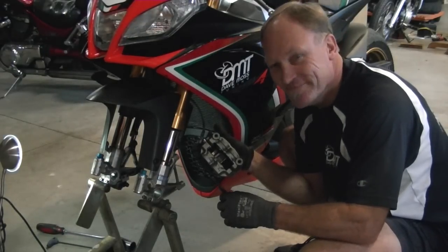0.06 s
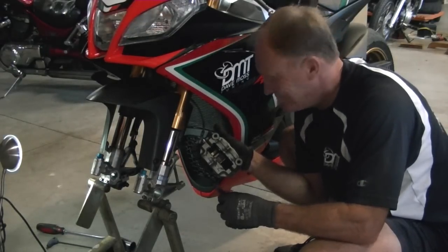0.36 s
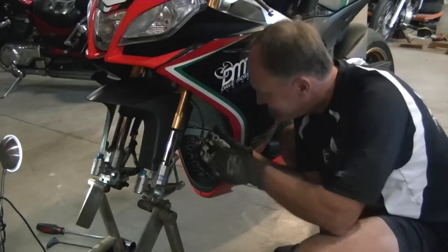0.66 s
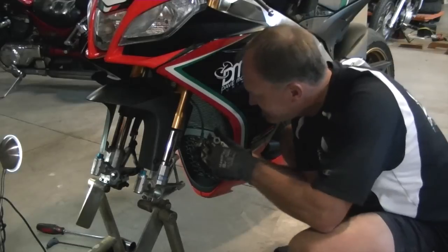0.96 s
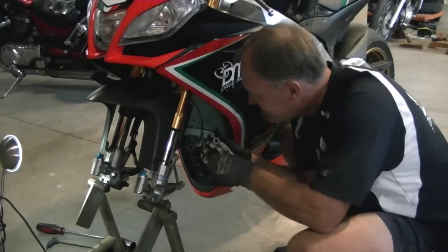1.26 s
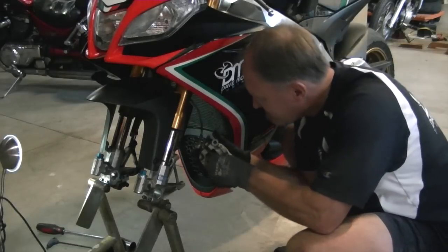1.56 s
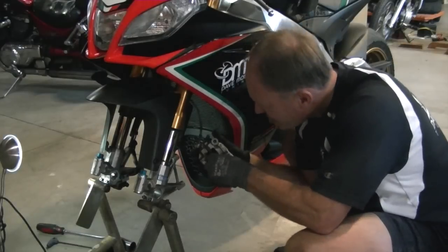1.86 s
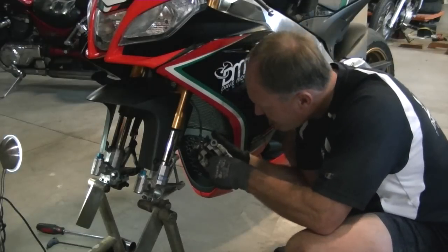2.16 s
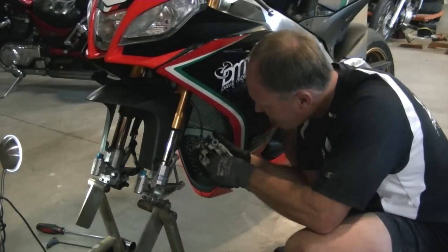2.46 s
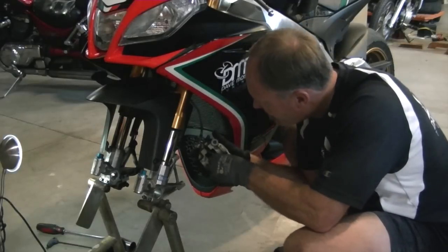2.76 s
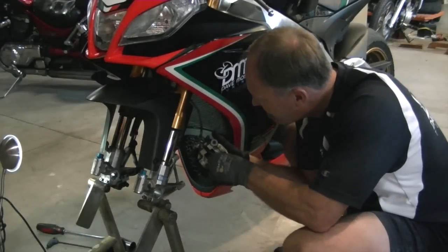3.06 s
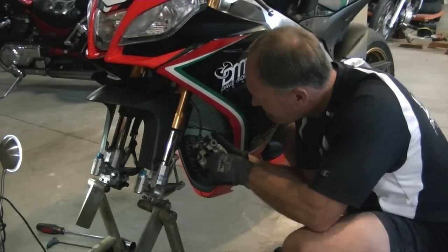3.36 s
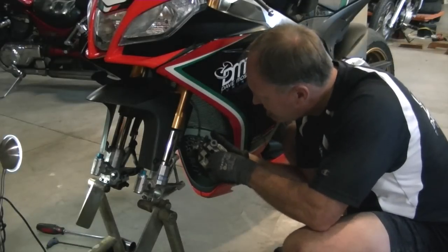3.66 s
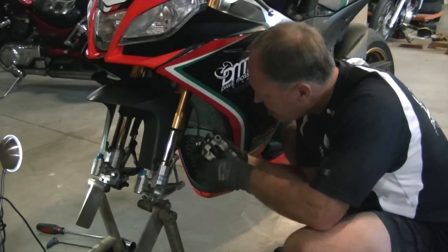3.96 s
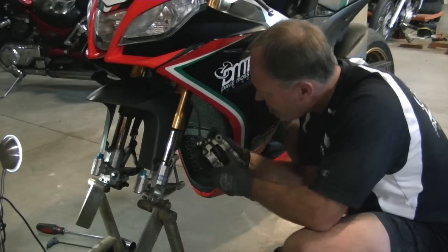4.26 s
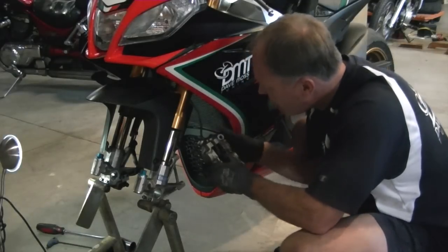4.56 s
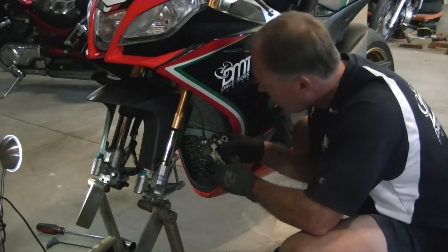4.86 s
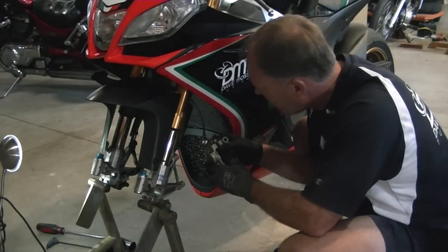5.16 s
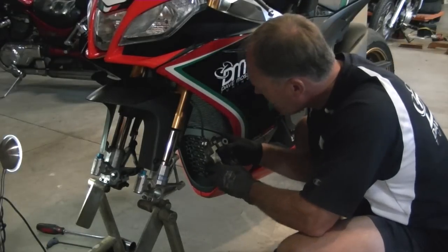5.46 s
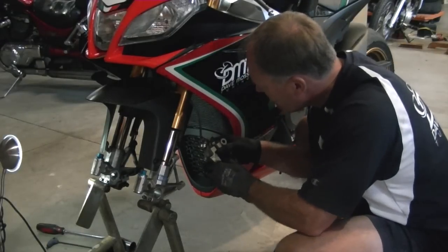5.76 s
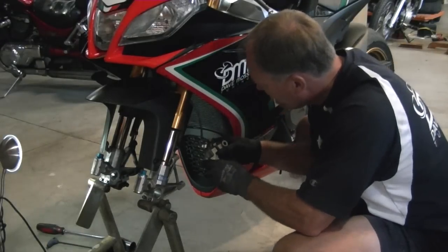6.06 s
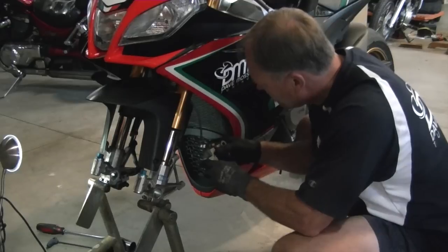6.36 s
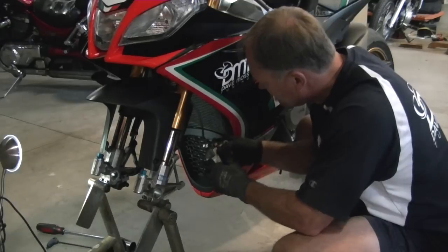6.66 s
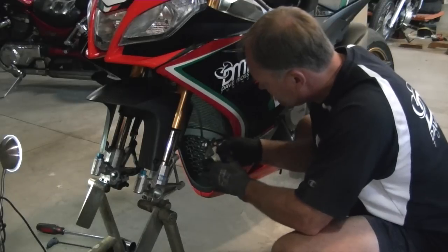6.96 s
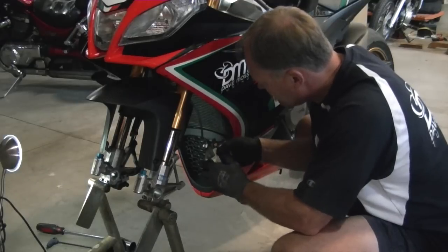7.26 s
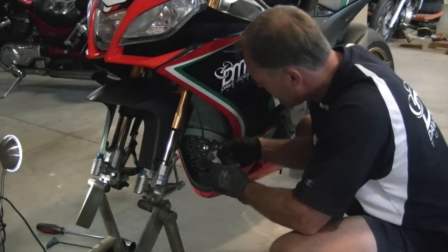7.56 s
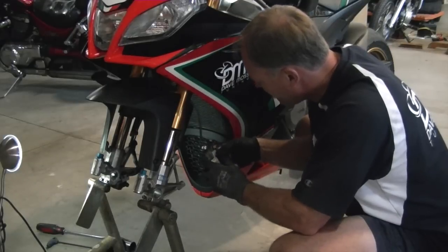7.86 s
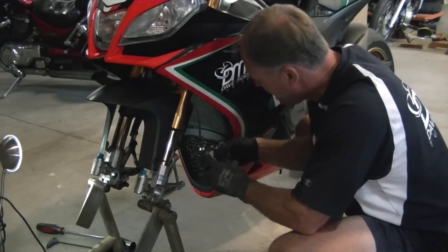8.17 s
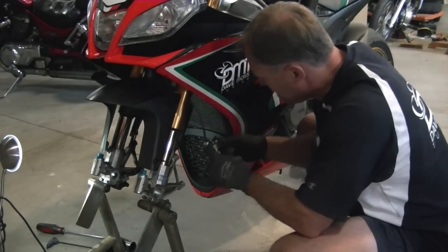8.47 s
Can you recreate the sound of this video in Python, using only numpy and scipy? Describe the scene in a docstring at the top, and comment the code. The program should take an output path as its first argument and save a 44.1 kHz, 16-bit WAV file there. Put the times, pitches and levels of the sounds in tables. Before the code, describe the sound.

Light, irregular metallic clinks and ticks, with one sharp snap, as brake pads are fitted over a steady electrical hum.

```python
"""A large workshop: mains hum and a fan fill the hall, whose hard walls ring on after each blow.
Short noisy washes start abruptly and fade. Gloved hands work brake pads into a motorcycle caliper.
The steel pads clink, knock dully in the caliper body, and tick or judder on the spring clip,
which once snaps home. Each blow is a brief chatter of contacts driving the damped modes of a part."""
import sys
import numpy as np
from scipy import signal
from scipy.fft import rfft, irfft, next_fast_len
from scipy.io import wavfile
from scipy.ndimage import uniform_filter1d

SR = 44100
rng = np.random.default_rng(int(sys.argv[2]) if len(sys.argv) > 2 else 0)


def log_audio(samples):
    """Write samples as a 16-bit WAV file to the path given in sys.argv[1]."""
    # one column per channel
    frames = np.atleast_2d(samples).T
    # limit to full scale, then quantise
    limited = np.clip(frames, -1, 1)
    pcm = np.round(limited * 32767).astype(np.int16)
    wavfile.write(sys.argv[1], SR, pcm)


N = 380141
BLOW_TIME_S = np.arange(4096) / SR


def amp(db):
    """Decibels to gain."""
    return 10 ** (np.asarray(db) / 20)


def unit(x):
    """Scales to rms 1."""
    return x / np.sqrt(np.mean(x ** 2) + 1e-20)


def curve(points, hz):
    """Interpolates (Hz, value) points over log frequency."""
    point_hz, value = np.transpose(points)
    return np.interp(np.log(hz + 1), np.log(point_hz), value)


def add(mix, time_s, sound):
    """Mixes in a stereo sound at time_s."""
    part = mix[:, max(round(time_s * SR), 0):][:, :sound.shape[1]]
    part += sound[:, :part.shape[1]]


def drift(rate_hz):
    """Slow random wander, rms 1."""
    steps = rng.standard_normal(400)
    return unit(np.interp(np.arange(N) / SR * rate_hz, np.arange(len(steps)), steps))


# air spectrum: (frequency [Hz], relative density [dB])
AIR_SPECTRUM = [(22, -18), (40, -16.5), (68, -1.5), (160, -1), (350, -1), (500, -3.5), (750, -3.5),
                (1300, -8), (2000, -12.5), (3200, -17.5), (5000, -23), (7500, -25.5), (11500, -18.5),
                (14000, -22), (16000, -49)]
# left-right likeness: (frequency [Hz], correlation [0..1])
AIR_CORRELATION = [(60, 0.88), (250, 0.57), (600, 0.13), (2000, 0.073), (12000, 0.067)]
# stereo balance: (frequency [Hz], left minus right [dB])
AIR_BALANCE = [(60, -5.5), (300, -3.5), (1000, 2), (4000, -1), (12000, -1)]


def air(level_db=-47.5):
    """Steady ventilation rumble, nearly mono in the bass, under a fine hiss."""
    size = 2 * next_fast_len(N // 2 + 1)
    hz = np.fft.rfftfreq(size, 1 / SR)
    left, independent = rfft(rng.standard_normal((2, size)))
    correlation = np.clip(curve(AIR_CORRELATION, hz), -1, 1)
    right = correlation * left + np.sqrt(1 - correlation ** 2) * independent
    shape_db = curve(AIR_SPECTRUM, hz) + np.array([[0.5], [-0.5]]) * curve(AIR_BALANCE, hz)
    return amp(level_db) * unit(irfft(np.array([left, right]) * amp(shape_db))[:, :N])


def fan(hz=334.5, level_db=-58):
    """One fan tone, unsteady in level and phase."""
    phase = 2 * np.pi * hz * np.arange(N) / SR
    tone = unit(drift(9) * np.cos(phase) + drift(9) * np.sin(phase))
    return amp(level_db) * tone * amp([[-1.5], [1.5]])


# hum partials: (harmonic [n], left level [dB], right level [dB])
HUM_PARTIALS = [(1, -69, -56.5), (2, -48.5, -43), (3, -54.5, -51), (4, -70.5, -64), (5, -55.5, -45.5),
                (6, -76, -60), (7, -68, -48), (8, -59.5, -51), (9, -105, -64), (10, -62, -55.5),
                (11, -98, -80), (12, -67, -80), (13, -55.5, -98), (14, -75.5, -64)]


def mains_hum(base_hz=120.05, waver=0.021, ear_gap_rad=0.63):
    """Mains partials stand in the hall, differing in level and phase at each ear."""
    base_phase = 2 * np.pi * base_hz * np.arange(N) / SR
    out = np.zeros((2, N))
    for harmonic, left_db, right_db in HUM_PARTIALS:
        offset = 2 * np.pi * rng.random() + ear_gap_rad * rng.choice([-1, 1]) * np.array([[0.5], [-0.5]])
        partial = np.sin(harmonic * base_phase + offset)
        out += amp([[left_db], [right_db]]) * partial * (1 + waver * drift(3.2))
    return out


# tail decay: (frequency [Hz], t60 [s])
HALL_DECAY = [(300, 2), (1000, 0.92), (3000, 1.5), (8000, 1.17), (13000, 2)]
# tail spectrum: (frequency [Hz], gain [dB])
HALL_SPECTRUM = [(300, 0), (1000, -10.5), (3000, -6), (5000, -10), (7800, -9), (10000, -20), (14000, -29)]


def hall(sound, early_db=-15, early_decay_s=0.039, tail_rise_s=0.0033):
    """Quick reflections off the fairing and floor, then a long diffuse tail."""
    hz, frame_s, spectra = signal.stft(rng.standard_normal((2, SR)), SR, nperseg=256)
    t60_s = curve(HALL_DECAY, hz)[:, None]
    spectra *= amp(curve(HALL_SPECTRUM, hz)[:, None] - 60 * frame_s / t60_s)
    spectra *= np.sqrt(np.log(10 ** 6) / t60_s / SR)  # evens out energy across decay times
    t = np.arange(SR) / SR
    tail = signal.istft(spectra, SR, nperseg=256)[1][:, :SR] * np.minimum(t / tail_rise_s, 1)
    early = rng.standard_normal((2, SR)) * (rng.random((2, SR)) < 0.03)
    early *= np.exp(-t / early_decay_s) * (t > 0.004)
    response = tail + amp(early_db) * unit(early) / np.sqrt(SR)
    return signal.fftconvolve(sound, response, axes=1)[:, :N]


def grainy_noise(spectrum, size, grain_db):
    """Shaped stereo noise with random spikes."""
    grains = rng.standard_normal((2, size)) * amp(grain_db * rng.exponential(1, size).clip(0, 4))
    return irfft(rfft(grains) * amp(curve(spectrum, np.fft.rfftfreq(size, 1 / SR))), size)


# noisy washes: (time [s], level [dB], length [s])
WASHES = [(0.0, -42.5, 0.18), (1.142, -51, 0.052), (1.176, -50, 0.1), (1.817, -43, 0.2), (2.078, -48, 0.15),
          (3.957, -40.5, 0.13), (4.509, -52, 0.204), (5.57, -48, 0.15), (6.662, -40, 0.088)]


def noisy_washes(rise_s=0.001):
    """Short noisy washes that start abruptly and fade: scuffs, room ring, far-off clatter."""
    spectrum_hz_db = [(200, -20), (500, 4), (1200, -3), (2400, 0.5), (4500, -11), (8000, -13),
                      (14000, -26.5)]
    t = np.arange(SR // 2) / SR
    out = np.zeros((2, N))
    for time_s, db, length_s in WASHES:
        noise = unit(grainy_noise(spectrum_hz_db, len(t), grain_db=4))
        envelope = (1 - np.exp(-t / rise_s)) * np.exp(-2 * t / length_s)
        add(out, time_s, amp(db) * (noise + 0.2 * noise[::-1]) * envelope)  # channel crossfeed
    return out


# glove strokes: (peak time [s], level [dB], swell and fade constant [s])
GLOVE_STROKES = [(.5465, -43.5, 0.0013), (.624, -46.5, 0.016), (1.71, -62, .08)]
# glove hiss: (frequency [Hz], relative density [dB])
GLOVE_SPECTRUM = [(1000, -20), (5000, -15), (8500, 0), (11000, -3), (15000, -12)]


def glove_brushes():
    """Glove fibres catch on the metal in a hiss that swells and fades."""
    t = np.arange(N) / SR
    swell = sum(amp(db) * np.exp(-abs(t - peak_s) / width_s) for peak_s, db, width_s in GLOVE_STROKES)
    hiss = grainy_noise(GLOVE_SPECTRUM, 2 * next_fast_len(N // 2 + 1), grain_db=3)[:, :N]
    return swell * unit(hiss + 0.33 * hiss[::-1])


def ring(modes, crack_db, contact_hz, focus_hz=3000, focus_db=0, tilt_db_oct=0,
         grip_db=2, detune=0.01, damping=1):
    """A dry crack and dying modes; the contact point favours those near focus_hz."""
    t = BLOW_TIME_S
    hz, db, t60_s = np.transpose(modes)[:, :, None]
    grip, shift = rng.standard_normal((2, len(modes), 1))  # the grip differs from blow to blow
    octaves = np.log2(hz / focus_hz)
    favoured = np.exp(-(octaves / 0.14) ** 2)
    db = db + tilt_db_oct * octaves + focus_db * favoured + grip_db * grip
    loss_per_s = damping * np.log(1000) / t60_s
    envelopes = amp(db) * 2 * loss_per_s / SR * np.exp(-loss_per_s * t)
    partials = envelopes * np.cos(2 * np.pi * hz * (1 + detune * shift) * t)
    crack = signal.lfilter(*signal.butter(1, 500, "highpass", fs=SR), 1.0 * (t == 0))
    softness = signal.butter(2, contact_hz, fs=SR)  # a softer contact lasts longer and loses treble
    return signal.lfilter(*softness, partials.sum(0) + amp(crack_db) * crack)


def blow(body, chatter_s, width=0.47, rise_s=0.0001):
    """Metal chatters as it lands and rings the body; rms 1 over the loudest 4 ms."""
    t = BLOW_TIME_S
    envelope = np.exp(-t / chatter_s) * (1 - np.exp(-t / rise_s))
    mid, side = rng.standard_normal((2, len(t)))
    force = (mid + width * np.array([[1], [-1]]) * side) * envelope
    for _ in range(3):  # tiny sharp contacts feed all frequencies alike
        spectrum = rfft(force)
        force = irfft(spectrum / (abs(spectrum) + 1e-9)) * envelope ** 0.13
    sound = signal.fftconvolve(force, body[None], axes=1)[:, :len(t)]
    peak_power = uniform_filter1d(sound.mean(0) ** 2, size=176).max()
    return sound / np.sqrt(peak_power)


# caliper body: (frequency [Hz], relative level [dB], nominal t60 [s])
CALIPER_MODES = [(467, -16, 0.042), (553, -24, 0.025), (693, 1.5, 0.053), (1086, 2, 0.05),
                 (1186, -1.5, 0.033), (1330, -3, 0.036), (1640, -15, 0.021), (2159, -15, 0.018),
                 (2720, -16, 0.045), (3220, -17, 0.022), (4600, -14, 0.0158)]
# pad against caliper: (time [s], relative level [dB])
CALIPER_KNOCKS = [(2.423, -45), (3.414, -37), (3.737, -39.5), (3.757, -42), (3.9879, -27.5), (4.086, -34.5),
                  (4.285, -29.5), (4.431, -30), (5.605, -34), (5.66, -44), (6.674, -38), (6.688, -28.5),
                  (6.917, -29.5), (6.925, -32), (7.475, -47.5)]


def caliper_knocks(gain_db=-1):
    """A pad butts the caliper, which the glove damps to a short dull knock."""
    out = np.zeros((2, N))
    for time_s, db in CALIPER_KNOCKS:
        body = ring(CALIPER_MODES, crack_db=-30, contact_hz=3000, grip_db=1, damping=1.2)
        add(out, time_s, amp(db + gain_db) * blow(body, chatter_s=0.0069, width=0.32, rise_s=0.0034))
    return out * amp([[-1], [1]])


def padded_push():
    """A padded push wakes only the lowest caliper modes."""
    body = ring(CALIPER_MODES, crack_db=-40, contact_hz=556, focus_hz=540, focus_db=27, tilt_db_oct=-38)
    return blow(body, chatter_s=0.014, width=0.34, rise_s=0.0027)


# hand against caliper: (time [s], relative level [dB])
HAND_BUMPS = [(1.399, -39.5), (1.826, -45), (7.824, -43), (7.867, -42), (8.092, -44)]


def hand_bumps(gain_db=-1):
    """The hand meets the caliper through the glove."""
    out = np.zeros((2, N))
    for time_s, db in HAND_BUMPS:
        add(out, time_s, amp(db + gain_db) * padded_push())
    return out


# low, top and twisting pad modes: (frequency [Hz], relative level [dB], nominal t60 [s])
PAD_LOW_MODES = [(600, 1.5, 0.035), (1130, 5.5, 0.042), (1410, 6.5, 0.036), (2114, -0.5, 0.011),
                 (2565, -0.5, 0.021), (3047, 1.5, .03), (3540, -0.5, 0.028), (3750, -12, 0.045)]
PAD_TOP_MODES = [(7250, -15, 0.022), (7610, 9, 0.023), (10400, -16, 0.021)]
PAD_TWIST_MODE = [(5100, 0, 0.057)]
# loose pad on metal: (time [s], relative level [dB], favoured frequency [Hz], top-mode offset [dB])
PAD_CLINKS = [(0.3999, -40, 2110, -30), (1.1823, -41, 1810, -15), (1.214, -32.5, 3470, -17),
              (1.3964, -24, 3540, -20), (2.2658, -31, 3020, -19), (2.7321, -36, 3100, -27),
              (2.9466, -24.5, 2630, -12.5), (2.9657, -28.5, 3300, -18), (2.983, -25.5, 3050, -19),
              (3.1152, -33, 2490, -29), (5.0553, -32.5, 2280, -8), (5.3028, -41.5, 2740, -13),
              (5.4175, -44.5, 2720, -27), (5.9556, -35, 2200, -34), (6.9575, -32, 3760, -3)]


def pad_clinks(top_gain_db, twist_gain_db, damping, gain_db=-7.5, chatter_s=0.0034):
    """A steel pad rings in the modes that its contact point favours."""
    best_twist_hz, twist_fall_db_oct = 2640, 40
    out = np.zeros((2, N))
    for time_s, db, focus_hz, top_db in PAD_CLINKS:
        body = ring(PAD_LOW_MODES, crack_db=-25, contact_hz=3800, focus_hz=focus_hz, focus_db=12,
                    detune=0.012, damping=damping)
        low = blow(body, chatter_s, rise_s=0.00099)
        top = blow(ring(PAD_TOP_MODES, crack_db=-27, contact_hz=11000), chatter_s)
        twist = blow(ring(PAD_TWIST_MODE, crack_db=-50, contact_hz=7000), chatter_s)
        twist_db = twist_gain_db - twist_fall_db_oct * abs(np.log2(focus_hz / best_twist_hz))
        clink = low + amp(top_db + top_gain_db) * top + amp(twist_db) * twist
        add(out, time_s, amp(db + gain_db) * clink)
    return out * amp([[-1.5], [1.5]])


# spring clip: (frequency [Hz], relative level [dB], t60 [s])
CLIP_MODES = [(1930, -27, 0.01), (3150, -11, 0.0049), (4500, -4.5, 0.0087), (6500, 0, 0.013),
              (7100, -5, 0.0071), (7880, -3, 0.005), (8780, 0.5, 0.0034), (9620, -8, 0.005),
              (10160, -1, 0.0047), (10670, -6, 0.0067), (12340, 0.5, 0.0073), (12400, -33, 0.016)]
# pad pressure on the caliper: (time [s], thud and push gain [dB])
PAD_PRESSURE = [(2.4, 4.5), (4.7, -1), (6.5, -0.5), (7.4, 4), (8.5, 4.5)]


def clip_slip(time_s, db, tick_gain_db=-11.5, thud_db=-43.5, push_db=-46, usual_db=-20.5):
    clip = ring(CLIP_MODES, crack_db=-15.5, contact_hz=12300, detune=0.014)
    tick = blow(clip, chatter_s=0.0067, rise_s=0.00054)
    caliper = ring(CALIPER_MODES, crack_db=-39.5, contact_hz=2200, focus_hz=1190, focus_db=8)
    shake = amp(thud_db) * blow(caliper, chatter_s=0.015) + amp(push_db) * padded_push()
    pressure_db = np.interp(time_s, *np.transpose(PAD_PRESSURE))
    shake_db = 0.46 * (db - usual_db) + pressure_db  # grows more slowly than the tick
    return amp(db + tick_gain_db) * tick + amp(shake_db) * shake


# single slips: (time [s], relative level [dB])
CLIP_TICKS = [(0.967, -29), (2.4193, -26.5), (4.37, -25.5), (4.7137, -29), (4.7677, -23.5), (5.0554, -35.5),
              (5.5619, -28), (6.2396, -28), (6.5059, -24), (6.5884, -28.5), (6.9268, -30), (7.334, -23),
              (7.7415, -21.5), (8.1447, -29.5), (8.2592, -31.5), (8.4936, -32.5), (8.557, -25.5)]
# stick-slip runs: (start [s], slips [n], interval [s], first relative level [dB], step per slip [dB])
CLIP_JUDDERS = [(3.4082, 3, .0108, -22.5, -4.5), (4.5234, 2, 0.017, -29, -1), (4.568, 3, .0198, -27.5, 0.5),
                (6.6562, 3, 0.0099, -25, -1)]


def clip_ticks():
    out = np.zeros((2, N))
    for time_s, db in CLIP_TICKS:
        add(out, time_s, clip_slip(time_s, db))
    for start_s, slips, interval_s, db, step_db in CLIP_JUDDERS:
        for k in range(slips):
            add(out, start_s + k * interval_s, clip_slip(start_s, db + k * step_db))
    return out


# seated assembly: (frequency [Hz], relative level [dB], nominal t60 [s])
SEATED_MODES = [(653, -18, 0.048), (1106, 3, 0.07), (1390, 2, 0.052), (2200, 1, 0.016), (2800, -10, 0.021),
                (3630, -2.5, 0.015), (4180, -21, 0.0083), (6070, -11, 0.011), (7340, -5, .013),
                (7400, -21, .015), (7900, 2, 0.013), (8660, -8, .009), (10500, -3, 0.011),
                (11460, -16, 0.011), (12900, -25, 0.016)]
# clip snaps home, pad lands: (time [s], level [dB], tilt [dB/octave])
SNAP_BLOWS = [(4.0651, -12.5, 5), (4.0678, -22.5, -2.5)]


def clip_snap(crack_db, damping):
    """Clip, pad and caliper ring together as the pad seats."""
    out = np.zeros((2, N))
    for time_s, db, tilt_db_oct in SNAP_BLOWS:
        body = ring(SEATED_MODES, crack_db, contact_hz=10500, tilt_db_oct=tilt_db_oct,
                    grip_db=-0.5, detune=0, damping=damping)
        add(out, time_s, amp(db) * blow(body, chatter_s=0.00158, width=0.36))
    return out


def scene():
    """Close handwork, its echo, and the steady sound of the hall."""
    knocks = caliper_knocks() + hand_bumps()
    ticks = clip_ticks()
    noises = noisy_washes() + glove_brushes()
    clinks = pad_clinks(top_gain_db=3, twist_gain_db=-13, damping=0.9)
    snap = clip_snap(crack_db=-37, damping=0.75)
    direct = clinks + snap + knocks + ticks + noises
    # summed over all directions, clinks and snap are less peaky
    diffuse_clinks = pad_clinks(top_gain_db=-2, twist_gain_db=-25, damping=1.8)
    diffuse_snap = clip_snap(crack_db=-14, damping=1.4)
    send = amp(0.5) * diffuse_clinks + amp(1) * diffuse_snap
    send += amp(1) * knocks + amp(-2) * ticks + amp(2) * noises
    return direct + hall(send) + mains_hum() + fan() + air()


def record(dry, cutoff_hz=15200):
    """Steep low-pass band limit."""
    lowpass = signal.firwin(127, cutoff_hz, window=("kaiser", 9), fs=SR)
    return signal.oaconvolve(dry, lowpass[None], "same")


dry = scene()
out = record(dry)
log_audio(out)
```